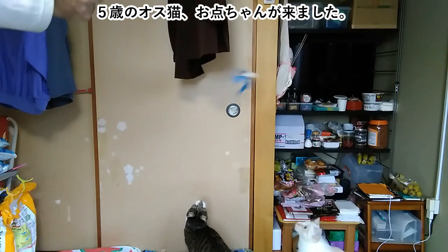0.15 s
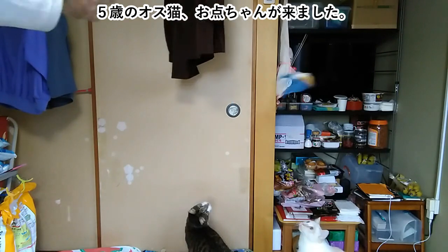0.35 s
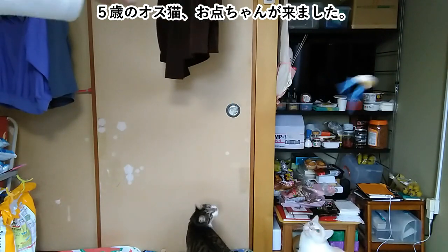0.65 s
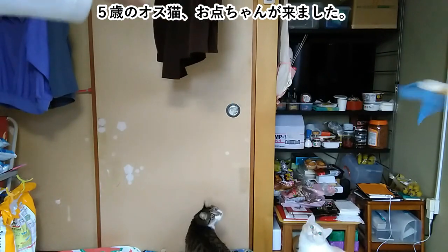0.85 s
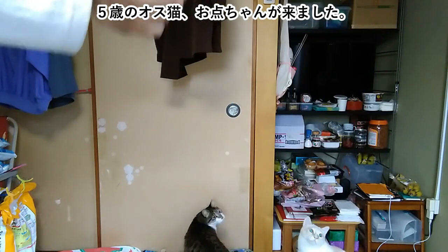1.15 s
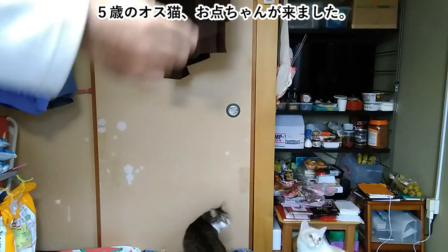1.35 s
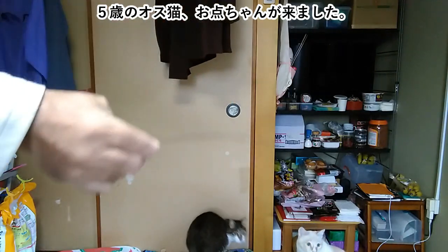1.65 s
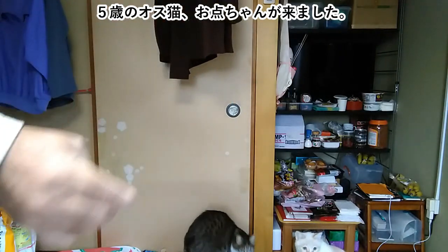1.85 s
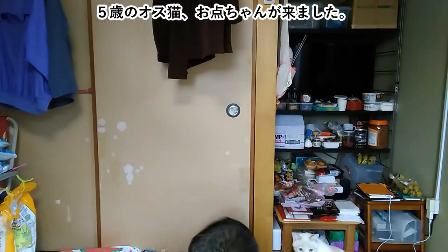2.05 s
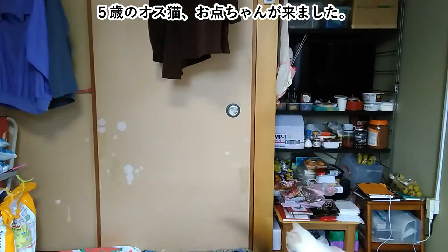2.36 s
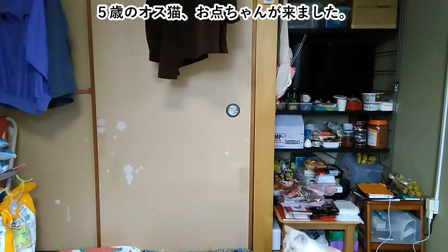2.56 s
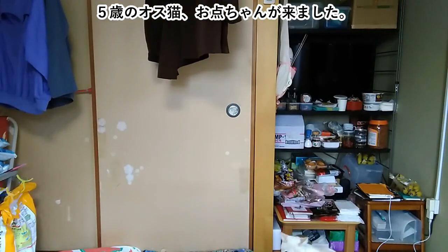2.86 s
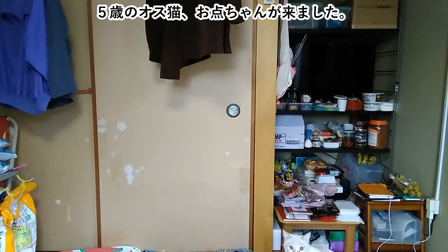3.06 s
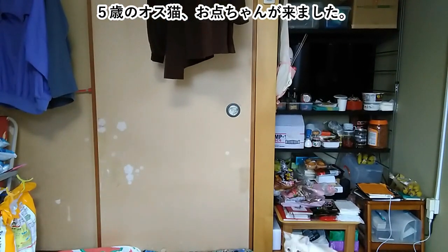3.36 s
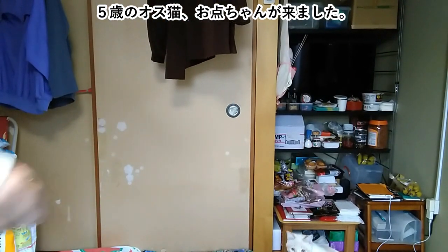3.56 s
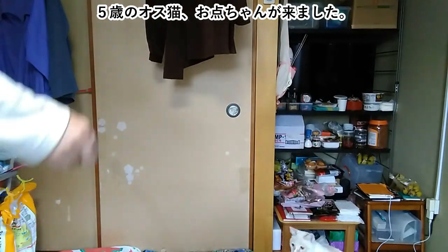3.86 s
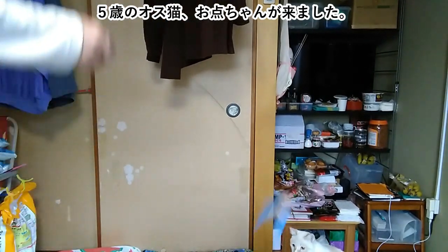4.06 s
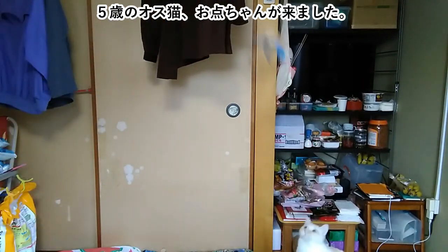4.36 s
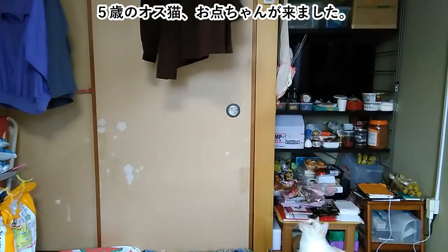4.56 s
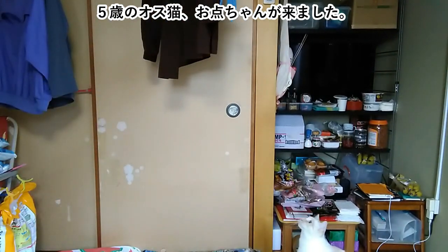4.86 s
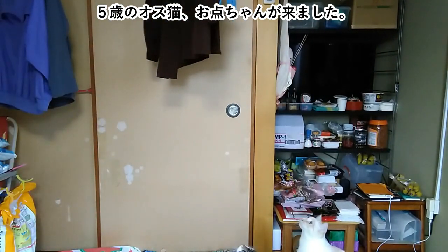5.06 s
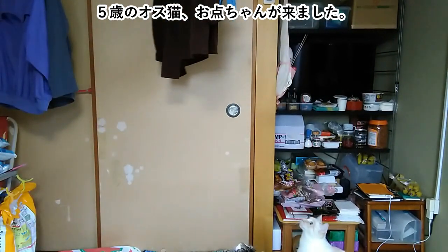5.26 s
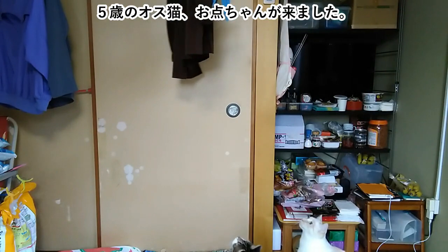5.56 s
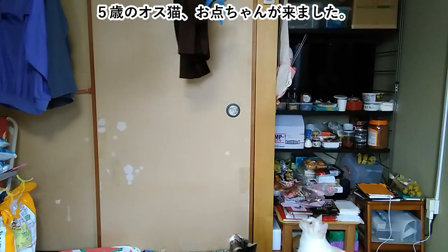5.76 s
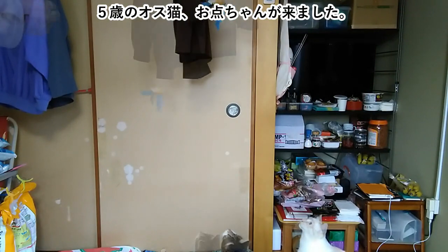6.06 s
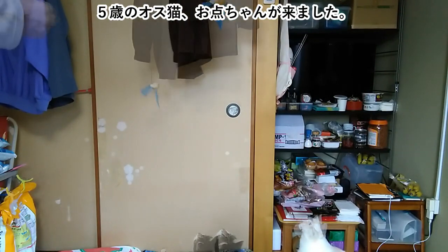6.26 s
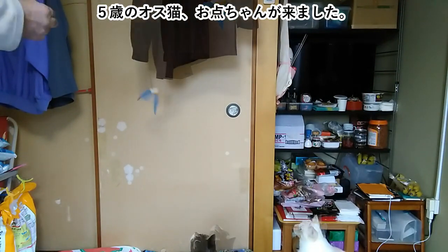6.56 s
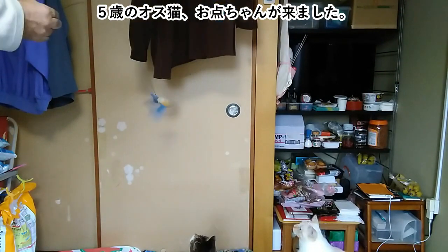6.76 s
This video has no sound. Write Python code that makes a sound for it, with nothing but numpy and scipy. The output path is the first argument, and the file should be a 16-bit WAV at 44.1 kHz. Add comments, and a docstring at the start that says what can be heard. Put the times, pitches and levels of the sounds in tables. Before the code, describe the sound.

A wand toy flicks, rustles and taps lightly in a small, quiet room. Then a cat pounces in several flurries, its paws thudding on a hollow wooden floor while its claws crack and scrabble on a mat close to the microphone. The cat goes still, leaving a few faint flicks of the toy over a soft rumble and hiss.

```python
"""A cat pounces on a wand toy in a small, quiet room with a hollow wooden floor.
At first the toy flicks, rustles and taps over a soft rumble and microphone hiss.
From about 2.4 seconds the cat pounces in several flurries: its paws thud and make the boards ring,
while its claws crack and scrabble on a mat. By 5 seconds the cat is still,
and only a few faint flicks and taps of the toy are left over the rumble and hiss."""
import sys
import numpy as np
from scipy import signal
from scipy.fft import rfft, irfft, next_fast_len
from scipy.io import wavfile
from scipy.ndimage import uniform_filter1d

SR = 44100
rng = np.random.default_rng(int(sys.argv[2]) if len(sys.argv) > 2 else 0)


def log_audio(samples):
    """Write samples as a 16-bit WAV file to the path given in sys.argv[1]."""
    # one column per channel
    frames = np.atleast_2d(samples).T
    # limit to full scale, then quantise
    limited = np.clip(frames, -1, 1)
    pcm = np.round(limited * 32767).astype(np.int16)
    wavfile.write(sys.argv[1], SR, pcm)


N = 304731

# The background sinks and swells. Each row: time in seconds, rumble level in dB, hiss level in dB.
BACKGROUND_LEVELS = [(0, -55.5, -70.5), (.6, -56.5, -68.5), (1.1, -56.5, -69), (1.9, -54.5, -72),
                     (2.4, -53.5, -69.5), (3.1, -55, -62.5), (3.75, -59.5, -65.5), (4.4, -56, -66),
                     (5.1, -61.5, -71.5), (5.9, -60.5, -71.5), (6.3, -58.5, -74), (6.5, -53.5, -71.5),
                     (6.91, -55.5, -72)]
# The tone of the background. Each row: frequency in Hz, level in dB.
BACKGROUND_TONE = [(12, -48.5), (20, -32), (38, -1.5), (86, -2), (124, -7.5), (361, -15), (479, -17.5),
                   (599, -18), (839, -21), (966, -21.5), (1110, -28), (2510, -30.5), (4790, -36.5),
                   (15200, -36), (16500, -72.5)]
# The room's echo. Each row: frequency in Hz, fade time in seconds (the time to drop by 60 dB).
ECHO_FADES = [(300, 0.59), (1000, 0.17), (4000, 0.41), (12000, 0.43)]
# How alike the two microphones hear. Each row: frequency in Hz, likeness (1 means the same).
MIC_LIKENESS = [(60, 0.95), (130, 1), (290, 0.52), (640, 0.71), (1400, 0.192), (3000, 0.118),
                (15000, 0.036)]
# The housing shades the left microphone from nearby treble. Each row: frequency in Hz, gain in dB.
LEFT_SHADE = [(6000, 0), (10000, 1.5), (13000, -18), (16000, -7.5)]
# Toy flicks and taps. Each row: start in seconds, level in dB, brightness in dB, ringing pitch in Hz.
TOY_FLICKS_AND_TAPS = [(.054, -46, -12, 2140), (.223, -46.5, -8, 1710), (.227, -53.5, -18, 3900),
                       (0.385, -39.5, -11, 2130), (.399, -47.5, -15, 1520), (0.569, -45.5, -10, 2720),
                       (.747, -44.5, -12, 2660), (.75, -49.5, -10, 4720), (0.916, -44.5, -13.5, 1800),
                       (.929, -48, -12.5, 2150), (1.088, -48.5, -11.5, 4430), (1.258, -50.5, -12, 2700),
                       (1.419, -50.5, -13, 4530), (1.422, -62, -22, 2620), (1.914, -47.5, -17, 2020),
                       (1.931, -57, -21, 1790), (2.353, -46, -8, 1990), (4.72, -45.5, -2, 8900),
                       (4.906, -64, -22, 2110), (5.19, -55, -2.5, 9000), (5.479, -59, -15, 988),
                       (5.905, -52, -15.5, 2060), (5.915, -66, -17, 1760), (6.371, -57, -13, 1860),
                       (6.77, -63, -16, 2480)]
# The tone of the toy's film streamers. Each row: frequency in Hz, level in dB.
STREAMER_TONE = [(530, -13.5), (900, -5.5), (1190, -10.5), (1720, -7), (3150, -6.5), (3600, -11),
                 (6310, -2.5), (13600, -5), (15900, -14), (16500, -23)]
# The notes the floor boards ring at. Each row: pitch in Hz, level in dB, fade time in seconds.
FLOOR_NOTES = [(52, 1.5, 0.6), (71.2, 4, 0.2), (91.8, 6.5, 0.17), (129.6, -3.5, 0.17), (147.6, 4.5, 0.11),
               (200.6, 1.5, 0.1), (228.3, 0.5, 0.073), (255.6, 2.5, 0.067), (312.5, 0, 0.06),
               (386.6, -0.5, 0.11), (495, 2.5, 0.056), (515, -7.5, 0.029), (663, -7, 0.089),
               (706, -14, 0.075)]
# Paw landings. Each row: start in seconds, level in dB, pitch driven hardest in Hz, fade time factor.
PAW_LANDINGS = [(2.358, -44, 110, 0.84), (2.466, -29, 161, 1.5), (2.489, -29, 147, 0.42),
                (2.547, -30.5, 207, 2.8), (2.615, -30, 350, 1.9), (2.637, -27.5, 141, 0.13),
                (2.663, -28, 256, 2.4), (2.695, -32, 200, 2), (2.736, -20, 460, 0.61),
                (2.766, -32, 113, 0.73), (2.811, -24, 140, 0.82), (2.815, -26.5, 374, 1),
                (2.833, -27.5, 103, 0.71), (2.941, -36, 87.5, 1.2), (3.032, -48, 152, 0.64),
                (3.214, -35.5, 660, 2.4), (3.244, -32.5, 97, 0.5), (3.419, -28, 130, 1.8),
                (3.426, -20, 262, 1.27), (3.49, -31.5, 259, 0.95), (3.534, -32.5, 149, 1.2),
                (3.605, -31, 240, 1.7), (3.631, -32.5, 93, .62), (3.686, -43, 70, 0.56),
                (4.008, -32.5, 114.5, 0.57), (4.03, -30, 87, 0.71), (4.23, -20.5, 214, 1.25),
                (4.249, -24.5, 157, 0.74), (4.276, -27, 148, 1.55), (4.308, -37, 70, 0.65),
                (4.422, -53, 75, 0.45), (4.517, -36, 89, 0.68), (4.746, -43.5, 71, 0.58)]
# Paw strokes over the mat. Each row: start in seconds, rise time in seconds, level in dB,
# fade time in seconds, then the fizz and the drumming, each in dB above that level.
PAW_STROKES = [(2.461, 0.0037, -37, 0.28, -1, 0), (2.505, 0.039, -42.5, 1, -5, 3),
               (2.596, 0.019, -36.5, 0.4, 1, -0.5), (2.669, 0.0021, -51, 0.47, -4, 14),
               (2.712, 0.024, -31, 0.24, -14, 6), (2.82, 0.02, -40.5, 0.18, -2, 4),
               (2.938, 0.0066, -50.5, 0.58, 0, 4), (3.028, 0.013, -61.5, 0.51, 1, 17),
               (3.202, 0.0084, -43.5, 0.62, -5, 7.5), (3.356, 0.011, -56, 0.19, -6, 2),
               (3.422, .003, -43.5, 0.38, -4, 8), (3.438, 0.013, -48, 1, 1.5, 5),
               (3.547, 0.0063, -46, 0.13, -9, 8.5), (3.602, 0.0038, -54, 0.15, -15, 20.5),
               (3.808, 0.0022, -56, 0.16, 5.5, -4), (3.88, 0.03, -65.5, 0.6, 6, -21),
               (4.004, 0.016, -42, 0.22, -8, 5), (4.221, 0.0037, -50.5, 0.32, 1.5, 13),
               (4.272, .004, -52.5, 0.21, 4.5, 10.5), (4.516, 0.0022, -66.5, 0.27, 8.5, 16.5),
               (4.718, .002, -69, 0.6, 4, -5)]
# The tones of the scraped mat, its high fizz and the hollow below. Each row: frequency in Hz, level in dB.
MAT_TONE = [(590, -15.5), (1000, -10), (1490, -8.5), (2080, -11.5), (2320, -12), (4500, -23), (5850, -30),
            (9900, -120)]
FIZZ_TONE = [(1760, -23.5), (3000, -5), (5270, -11), (8500, -3.5), (14900, -12.5), (16200, -5),
             (16500, -51)]
HOLLOW_TONE = [(150, -6), (250, -7), (339, -3.5), (456, -5.5), (666, -9.5), (713, -5.5), (1040, -12),
               (1300, -25), (1690, -50), (2860, -120)]
# Claw strikes. Each row: start in seconds, level in dB, brightness in dB, left minus right in dB,
# ringing pitch in Hz.
CLAW_STRIKES = [(2.462, -26.5, -20, -7, 1350), (2.486, -18.5, -8, -10, 1600), (2.493, -21, 11, -8, 1280),
                (2.503, -2, -3.5, -4, 2420), (2.6, -13, -3.5, -6, 3400), (2.613, -16.5, -6, -11.5, 1400),
                (2.637, -10, -3.5, -3, 1380), (2.669, -8.5, -3, -5, 6600), (2.693, -19.5, -12, -6, 1550),
                (2.727, -19, -11, -3, 5700), (2.732, -14.5, 6, -11, 6900), (2.7381, -5.5, -5, -5, 3456),
                (2.834, -23.5, -8.5, -13, 1490), (2.941, -34, -21, -7, 2980), (3.21, -52, -26, -4, 1310),
                (3.217, -46, -5, -6, 1500), (3.24, -31, -5, -6, 11100), (3.4234, -23.5, -14.5, -10.5, 1290),
                (3.442, -20, -2, -7, 1292), (3.489, -28.5, -5, -3, 1240), (3.555, -32, 3, -4, 1290),
                (3.605, -46, -18, -12, 1610), (3.809, -47, 3, -13, 1650), (3.884, -40, -2.2, -9, 6600),
                (3.892, -35.5, -0.5, -1, 5400), (4.007, -35, -7, -11, 2180), (4.016, -21.5, 9, -13, 1530),
                (4.022, -17.5, 3, 1, 6100), (4.029, -23, -5.5, -12, 2800), (4.049, -27.5, -0.5, -4, 4600),
                (4.058, -30, -1.5, 3, 6550), (4.275, -30, -13.5, -7, 1700), (4.325, -32, 8, -2, 7900),
                (4.514, -54, -22, -6, 1200)]
# The tone of a claw strike. Each row: frequency in Hz, level in dB.
CLAW_TONE = [(290, -15), (500, -3), (924, -6), (2290, 1), (5120, -6.5), (6380, -11), (7600, -15.5),
             (8670, -17), (15300, -21.5), (16500, -37.5)]

RIGHT_MIC_DB, TOP_HZ = 5.0, 16000  # how much more the right microphone picks up; where treble ends
USUAL_LEVEL_DB, USUAL_BRIGHT_DB, USUAL_RUMBLE_DB = -20, -10, -58


def amp(db):
    """Turn decibels into a number to multiply by."""
    return 10 ** (np.asarray(db) / 20)


def evened(x):
    """Scale a signal to an average power of 1."""
    return x / np.sqrt(np.mean(x ** 2) + 1e-20)


def read(table, hz):
    """Look up a frequency in a table, gliding between its rows."""
    row_hz, value = np.transpose(table)
    return np.interp(np.log(hz + 1), np.log(row_hz + 1), value)


def add(mix, start, sound):
    """Mix a sound in at a start time in seconds."""
    part = mix[:, round(start * SR):][:, :sound.shape[1]]
    part += sound[:, :part.shape[1]]


def colour(x, db_at):
    """Give a sound the tone db_at(hz), with a filter that never rings before the sound starts."""
    log_gain = np.log(amp(np.maximum(db_at(abs(np.fft.fftfreq(4096, 1 / SR))), -100)))
    taps = np.fft.ifft(np.exp(np.conj(signal.hilbert(log_gain)))).real[:2048]
    return signal.oaconvolve(x, taps[None] / np.linalg.norm(taps), axes=1)[:, :x.shape[1]]


def two_mics(noises):
    """Blend two unrelated noises: the microphones hear the bass alike and the treble differently."""
    left, other = rfft(noises)
    likeness = read(MIC_LIKENESS, np.fft.rfftfreq(noises.shape[1], 1 / SR))
    right = likeness * left + np.sqrt(1 - likeness ** 2) * other
    return irfft(np.array([left, right]), noises.shape[1])


def background():
    """Low rumble, a murmur of air and microphone hiss: swelling noise, unrelated left and right."""
    frames, hz = N // 512 + 5, np.fft.rfftfreq(2048, 1 / SR)
    a, b, c, d, patches = rng.standard_normal((frames, 1025, 5)).T
    noise = np.array([a + 1j * b, c + 1j * d])
    patches = evened(uniform_filter1d(uniform_filter1d(patches, 20, 0), 8, 1))  # slight flicker
    times, rumble_db, hiss_db = np.transpose(BACKGROUND_LEVELS)
    murmur_db = -65 + 0.85 * (rumble_db - USUAL_RUMBLE_DB)  # the murmur follows the rumble
    low, high = 1 / (1 + (hz / 250) ** 4), 1 / (1 + (3300 / (hz + 1)) ** 4)
    tone, strength = amp(read(BACKGROUND_TONE, hz)), 0
    for band, db in (low, rumble_db), (1 - low - high, murmur_db), (high, hiss_db):
        swell = amp(np.interp(np.arange(frames) * 512 / SR, times, db))
        strength += np.outer(tone * band / np.linalg.norm(tone * band), swell)
    spectra = noise * strength * amp(1.16 * patches + 2.5)
    return signal.istft(spectra, nperseg=2048, noverlap=1536)[1][:, :N]


def wall_echo(x):
    """The walls send back many small echoes, and each frequency dies away at its own speed."""
    echoes = np.zeros((2, SR // 2))
    delays = np.arange(200, SR // 2 - 20, 20) + rng.integers(0, 20, (2, (SR // 2 - 201) // 20))
    np.put_along_axis(echoes, delays, rng.choice([-1., 1.], delays.shape), 1)
    hz, t, spectra = signal.stft(echoes, SR, nperseg=256)
    fade = amp(-60 * t / read(ECHO_FADES, hz)[:, None])
    tail = signal.istft(spectra * fade, SR, nperseg=256)[1]
    return signal.fftconvolve(x, tail / np.linalg.norm(tail[0]), axes=1)[:, :N]


def snap(tone, db, bright_db, pan_db, ring_hz, ring_db, ring_s, rattle_db, rattle_s, rise_s):
    """A tick rings briefly at the pitch of the struck spot, then a rattle of tiny clicks dies away."""
    t = np.arange(SR // 4) / SR
    onset = 1 - np.exp(-t / rise_s)
    grit = rng.standard_normal((2, len(t))) * amp(2.4 * np.minimum(rng.exponential(1, len(t)), 4))
    clicks = two_mics(evened(grit)) * amp(rattle_db - 60 * t / rattle_s) * onset
    clicks[[0, 1], rng.integers(0, 8, 2)] += 1  # the tick reaches each microphone at its own moment
    clicks += 0.28 * rng.standard_normal((2, len(t))) * amp(-60 * t / 0.0038)  # the tick splinters
    tilt_db = 1.51 * (bright_db + 8.0)
    sound = colour(clicks, lambda hz: read(tone, hz) + tilt_db * np.tanh(np.log2((hz + 1) / 4500)))
    close_hz = ring_hz * (1 + 0.101 * rng.standard_normal((4, 1, 1)))  # four close notes sound rough
    ring = np.sin(2 * np.pi * (close_hz * t + rng.random((4, 2, 1)))).sum(0) / 2
    sound += amp(ring_db - 60 * t / ring_s) * ring * onset
    return amp(db) * sound * amp(np.array([[1], [-1]]) * (pan_db + RIGHT_MIC_DB) / 2)


def toy_flick_or_tap(db, bright_db, ring_hz):
    """The toy makes a bright, rustling snap, or a duller, pitched tap that rings more."""
    ring_db = -5 - (bright_db - USUAL_BRIGHT_DB)
    return snap(STREAMER_TONE, db, bright_db, pan_db=-5.5, ring_hz=ring_hz, ring_db=ring_db,
                ring_s=0.046, rattle_db=-11.5, rattle_s=0.29, rise_s=0.0013)


def paw_thud(db, hz, fade_factor, focus_db=19.5, swing_cycles=0.4):
    """A padded blow rings the boards near the pitch hz. Lower notes take longer to get going."""
    t = np.arange(SR // 3) / SR
    note_hz, note_db, fade_s = np.transpose(FLOOR_NOTES)[:, :, None]
    uneven, detune, spread = rng.standard_normal((len(FLOOR_NOTES), 3)).T[:, :, None]
    struck_db = note_db - focus_db * np.log2(note_hz / hz) ** 2 + 1.5 * uneven
    onset = (1 - np.exp(-t * note_hz / swing_cycles)) ** 2
    swing = onset * amp(struck_db - 60 * t / (fade_s * fade_factor))
    phase = 2 * np.pi * note_hz * (1 + 0.028 * detune) * t
    boards = np.array([(swing * np.sin(phase + side * 0.082 * spread)).sum(0) for side in (-1, 1)])
    bass_cut = signal.butter(2, 0.39 * hz, "high", fs=SR, output="sos")  # the slow push is silent
    boards = signal.sosfilt(bass_cut, boards)
    return amp(db) * boards / abs(boards).max()


def claw_scrabble():
    """Claws catch thread after thread: the tugs ring the mat, fizz and drum on the hollow below."""
    clumps = amp(2.04 * evened(uniform_filter1d(rng.standard_normal(N), 300)))
    noise = rng.standard_normal((2, N))
    tug_sizes = amp(2.45 * np.minimum(rng.exponential(1, N), 3))
    caught = rng.random(N) < 2500 / SR  # about 2500 threads a second
    grains = noise * (0.59 + tug_sizes * caught) * clumps
    scrape = two_mics(np.pad(grains, ((0, 0), (0, next_fast_len(N) - N))))[:, :N]
    layers = [evened(colour(scrape, lambda hz: read(tone, hz)))
              for tone in (MAT_TONE, FIZZ_TONE, HOLLOW_TONE)]
    fade_factors = np.array([[1], [0.92], [0.83]])  # fizz and hollow die sooner than the mat
    t, levels = np.arange(SR // 2) / SR, np.zeros((3, N))
    for start, rise_s, db, fade_s, fizz_db, drum_db in PAW_STROKES:
        onset = np.minimum(t / rise_s, 1) ** 2
        fall_db = -60 * np.maximum(t - rise_s, 0) / (fade_s * fade_factors)
        add(levels, start, onset * amp(db + np.array([[0], [fizz_db], [drum_db]]) + fall_db))
    return sum(level * layer for level, layer in zip(levels, layers)) / np.sqrt(2)


def claw_strike(db, bright_db, pan_db, ring_hz):
    """A claw cracks down. Duller strikes ring more; harder, brighter ones are more tick than rattle."""
    brighter_db = bright_db - USUAL_BRIGHT_DB
    rattle_db = -20 - 0.17 * (db - USUAL_LEVEL_DB) - 0.22 * brighter_db
    return snap(CLAW_TONE, db, bright_db, pan_db, ring_hz, ring_db=-6 - 0.45 * brighter_db,
                ring_s=0.012, rattle_db=rattle_db, rattle_s=0.14, rise_s=0.0005)


def scene():
    """Mix the floor's thuds, the nearby claws and toy, their echoes and the background."""
    floor, near = np.zeros((2, N)), claw_scrabble()
    for start, *landing in PAW_LANDINGS:
        add(floor, start, paw_thud(*landing))
    for start, *strike in CLAW_STRIKES:
        add(near, start, claw_strike(*strike))
    for start, *move in TOY_FLICKS_AND_TAPS:
        add(near, start, toy_flick_or_tap(*move))
    size = next_fast_len(N)
    shade = amp(read(LEFT_SHADE, np.fft.rfftfreq(size, 1 / SR)))
    near[0] = irfft(rfft(near[0], size) * shade, size)[:N]
    return floor + near + amp(-10.5) * wall_echo(near) + amp(-16.0) * wall_echo(floor) + background()


def record(dry):
    """The right side is louder; the sound has no deepest bass and no treble above 16 kHz."""
    sound = dry * amp([[-RIGHT_MIC_DB / 2], [RIGHT_MIC_DB / 2]])
    sound = signal.sosfilt(signal.butter(2, 32.0, "high", fs=SR, output="sos"), sound)
    treble_cut = signal.firwin(511, TOP_HZ, window=("kaiser", 9), fs=SR)
    return signal.oaconvolve(sound, treble_cut[None], "same")


dry = scene()
out = record(dry)
log_audio(out)
```